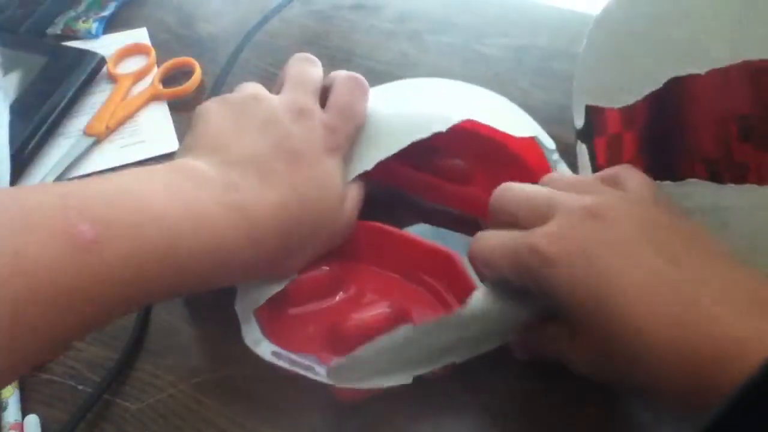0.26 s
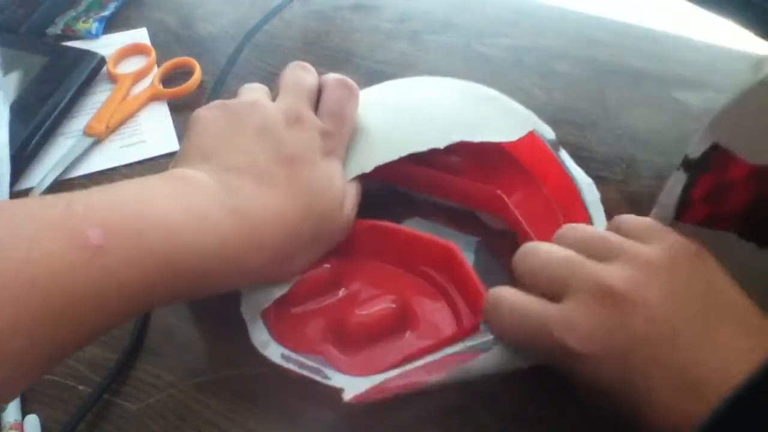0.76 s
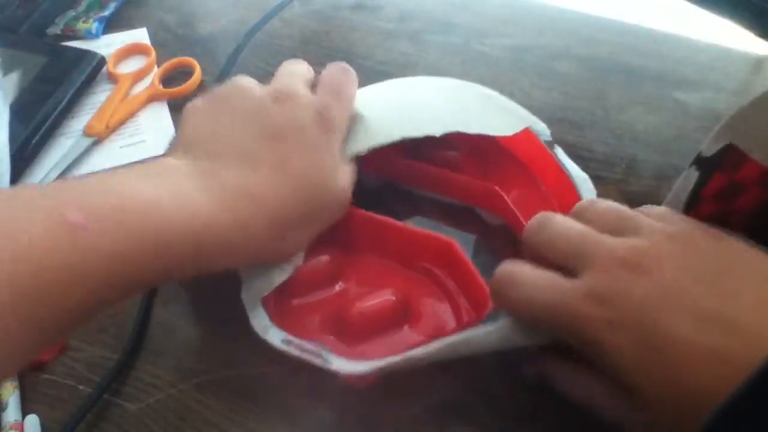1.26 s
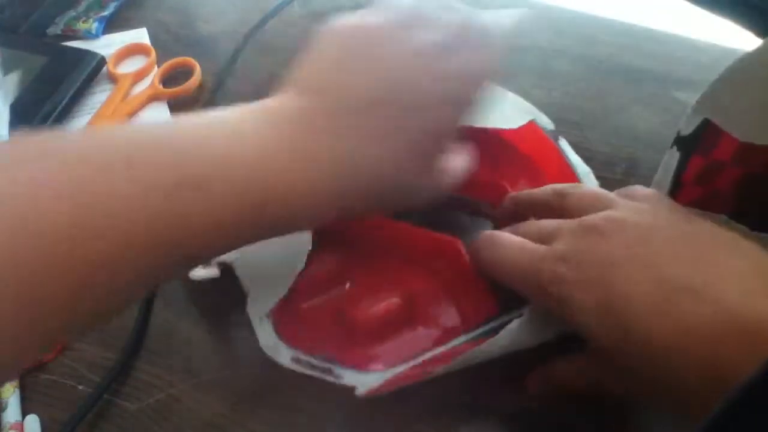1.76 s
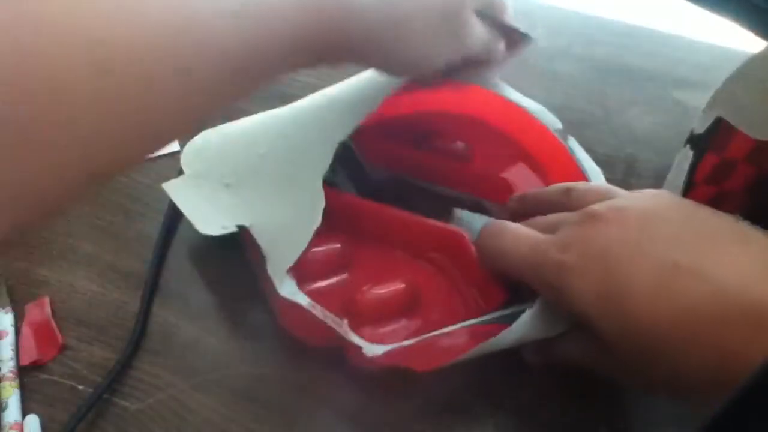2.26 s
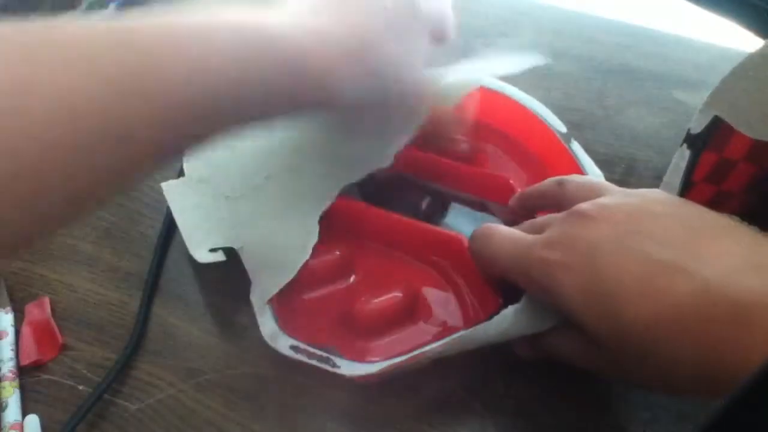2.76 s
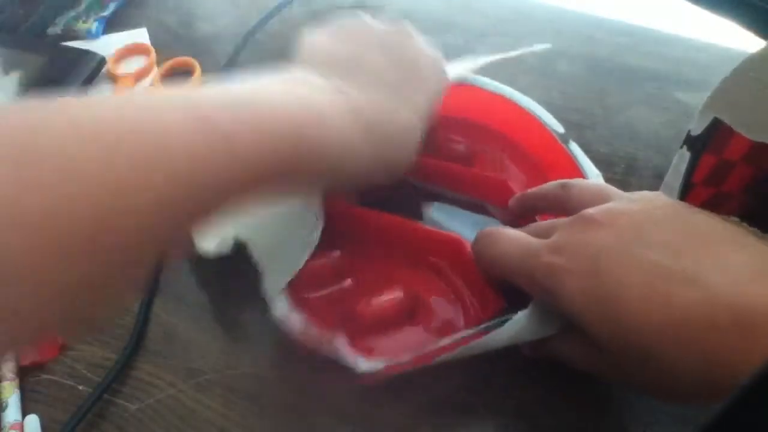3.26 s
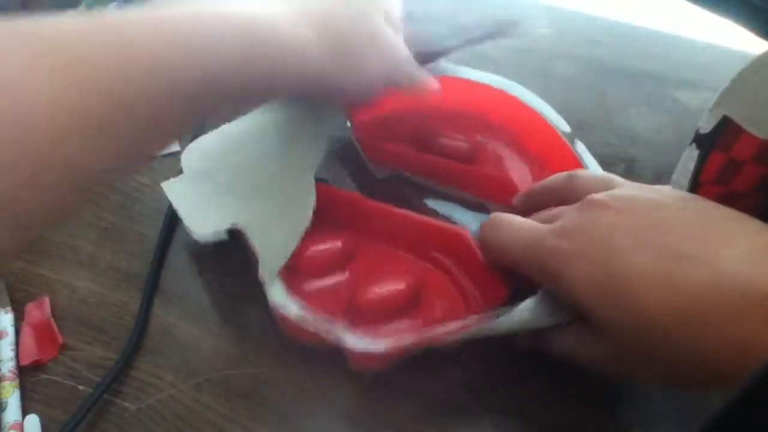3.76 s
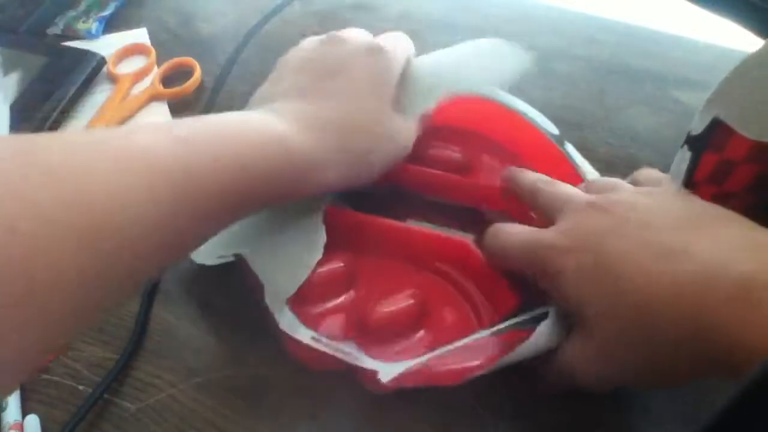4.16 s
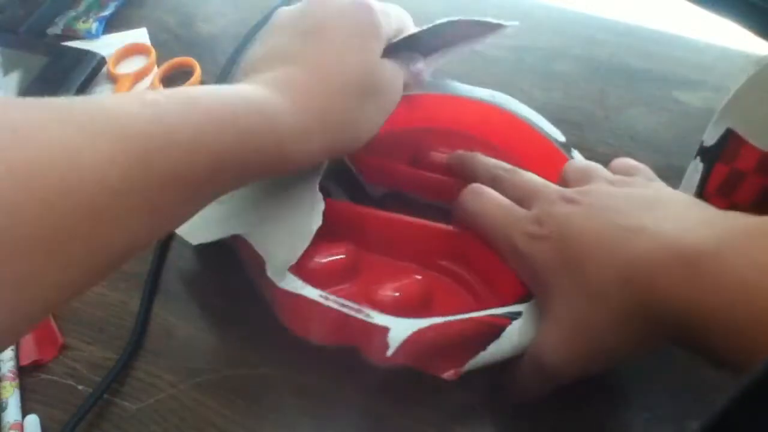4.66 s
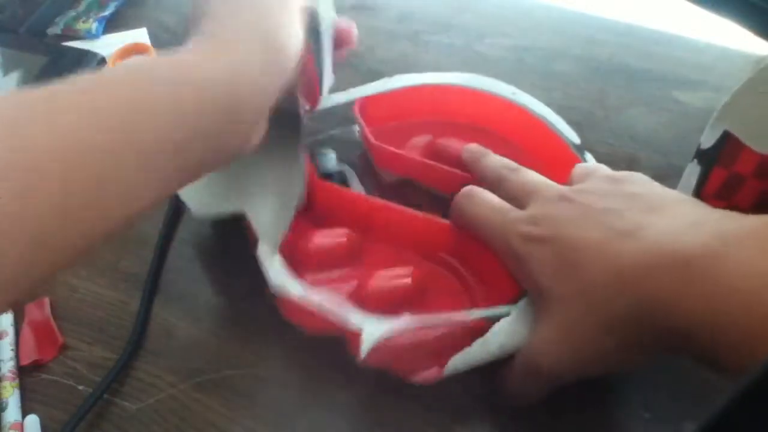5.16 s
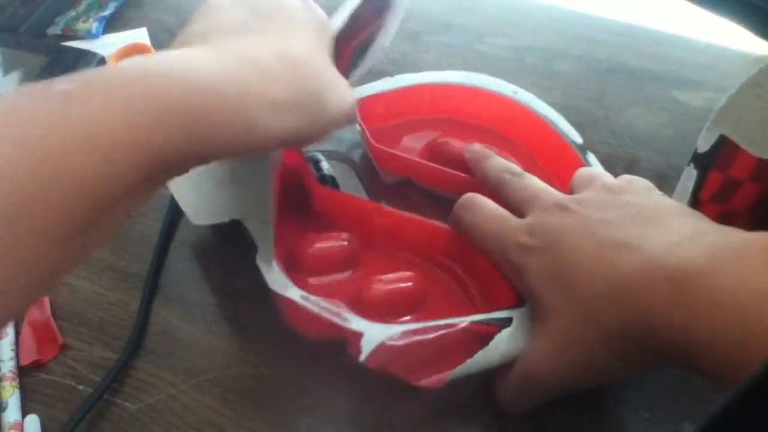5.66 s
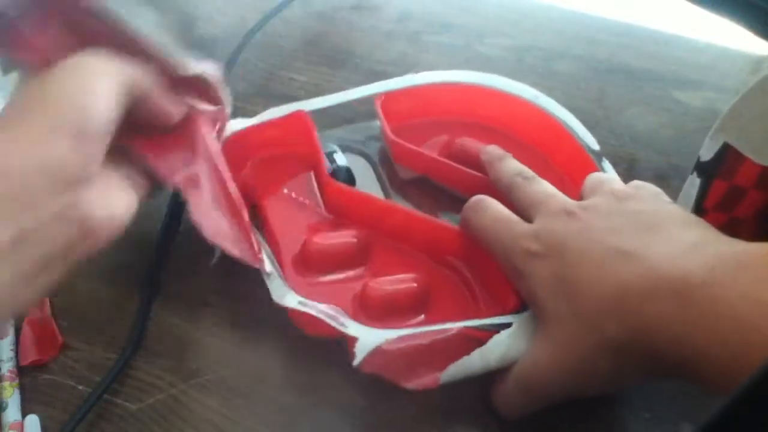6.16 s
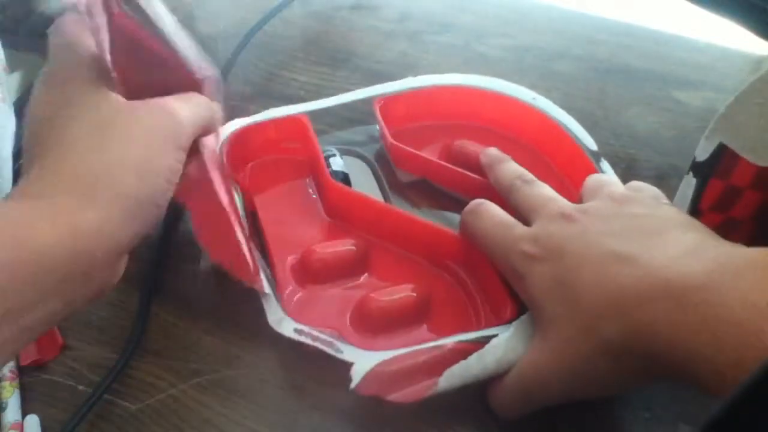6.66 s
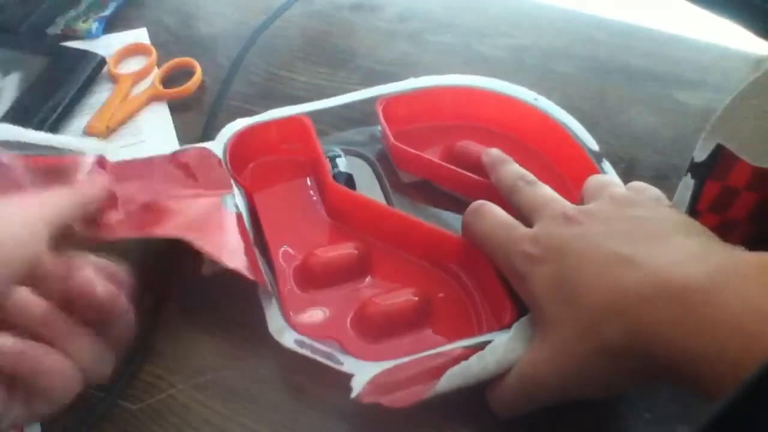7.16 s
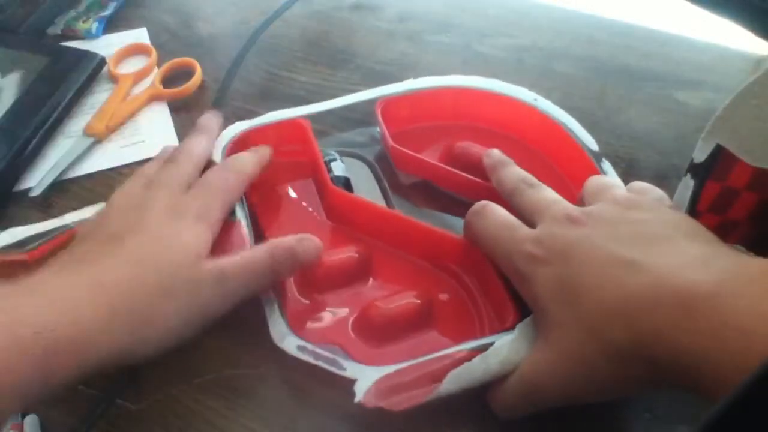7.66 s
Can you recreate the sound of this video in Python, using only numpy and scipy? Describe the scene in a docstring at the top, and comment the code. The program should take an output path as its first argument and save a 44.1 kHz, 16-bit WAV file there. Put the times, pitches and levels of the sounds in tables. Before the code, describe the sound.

A close, dry sound of card being torn off a thin plastic tray on a wooden table in a quiet room. From the start to 0.4 s, quick plastic pops, crackle and a brief creak; a hollow knock at 0.45, then the densest, loudest cluster of snaps at 0.6-0.8, followed by several knocks until 1.1. A small creak around 1.2, a snap with a knock at 1.45, then a hard pop near 2.0 and a sharp crack at 2.3. Faint crinkling leads to pops at 2.8 and 3.3-3.4, a dull knock at 3.85, and a bright snapping burst at 4.05. One strong pop at 4.8. From 5 to 6, small crackles and cracks, the brightest about 5.45, a pop at 5.67. Afterwards quiet uneven papery ripping, a pop at 6.6, soft bumps around 6.4, 6.9 and 7.55, and final clicks near 7.7. Low rumble and faint room tone throughout.

```python
"""In a quiet room, hands tear a card backing off a thin moulded plastic tray lying on a table.
The tray snaps as it buckles and knocks on the table top: rough contact forces ring decaying modes.
In between, random clicks through damped modes make the plastic crackle and the tray drag on the wood;
coloured, uneven noise is the bright hiss of ripping card. A dull rumble and room tone lie below."""
import sys
import numpy as np
from scipy import signal
from scipy.fft import rfft, irfft
from scipy.io import wavfile

SR = 44100
rng = np.random.default_rng(int(sys.argv[2]) if len(sys.argv) > 2 else 0)


def dump(signal):
    """Clip the signal to [-1, 1] and save it as 16-bit WAV at the path in sys.argv[1]."""
    limited = np.clip(np.atleast_2d(signal).T, -1, 1)
    pcm = np.round(limited * 32767).astype(np.int16)
    wavfile.write(sys.argv[1], SR, pcm)


N = 348381

# the plastic buckles: (time [s], level [dB], panel pitch [Hz], crack gain [dB])
SNAPS = [(0.069, -15, 1830, -11), (0.094, -15.5, 1400, -22), (0.12, -20, 1280, -5), (0.179, -13.5, 860, -4),
         (0.191, -9.5, 915, -36), (0.225, -18, 900, -11), (0.293, -25, 907, -10), (0.349, -20, 1410, -17),
         (0.575, -9.5, 1000, -11.5), (0.627, -5, 1600, -13), (0.71, -7.5, 1900, -3.5),
         (0.723, -6, 1900, -3), (0.755, -18, 1960, -31), (0.787, -9.5, 1030, -35), (0.922, -20, 1040, -21),
         (1.1, -30, 1130, 0.5), (1.151, -29, 1650, 2), (1.452, -12.5, 1210, -49), (1.607, -21, 1350, -39),
         (1.627, -21, 1380, -25), (1.638, -22.5, 1400, -35), (1.849, -22, 1330, -40),
         (1.975, -1.5, 1310, -36), (2.045, -17.5, 1070, -21), (2.121, -26, 2050, -1.5),
         (2.195, -18, 990, -31), (2.238, -15, 1340, -8), (2.278, -11.5, 2280, -28), (2.312, -17, 1350, -27),
         (2.322, -6, 1460, -1), (2.511, -21.5, 2260, -5), (2.776, -16, 1890, -6.5), (2.825, -9, 1900, -7),
         (3.105, -26, 1900, -27), (3.156, -21.5, 840, -19), (3.24, -19, 1170, -34), (3.278, -14, 1890, -44),
         (3.329, -7, 1900, -11), (3.403, -28, 1850, -31), (3.417, -5.5, 925, -3.5),
         (3.543, -19.5, 1720, -38), (4.032, -8, 2700, -2), (4.044, -12.5, 1720, -9),
         (4.062, -4.5, 1690, -37), (4.192, -18, 1190, -43), (4.705, -22.5, 1020, -40),
         (4.755, -19.5, 1470, -22), (4.799, -1, 1340, -23.5), (5.008, -31.5, 1710, 1),
         (5.082, -18, 950, -12), (5.169, -20.5, 1190, -14), (5.19, -23, 1950, -7), (5.272, -26, 1700, -18),
         (5.287, -21, 1470, -10), (5.402, -25.5, 1530, -5), (5.446, -12.5, 1160, 6),
         (5.62, -19.5, 1070, -33), (5.669, -8.5, 1840, -46), (5.736, -29, 1270, 4.5),
         (5.801, -20, 1850, -32), (5.834, -21, 2000, -8), (5.873, -24, 2020, -22), (5.935, -27, 2130, -40),
         (6.082, -24.5, 2040, -18), (6.12, -27, 1900, 1.5), (6.146, -33, 1260, -36),
         (6.265, -39, 1200, 6.5), (6.338, -38, 1230, -13), (6.382, -21.5, 2050, -9),
         (6.456, -31, 1290, -19), (6.619, -10, 1320, -44), (6.684, -25.5, 1370, -14),
         (7.063, -28, 2020, -6), (7.146, -29.5, 1230, -23), (7.557, -24.5, 1970, -13),
         (7.659, -8.5, 1340, -37), (7.669, -13, 2270, -36), (7.716, -21, 1060, -21)]
# a glued seam creaks in eight slips: (start time [s], first gap [s], level [dB])
CREAKS = [(0.061, 0.0055, -29.5), (.326, .031, -31), (1.208, 0.011, -31)]
# modes of the tray, before hands damp them: (frequency [Hz], level [dB], t60 [s])
TRAY = [(974, 6, 0.022), (1214, 12.5, 0.021), (1340, 4, 0.047), (1690, 9.5, 0.019), (2040, 10, 0.024),
        (2280, 11.5, 0.0095), (2713, 1.5, 0.037), (3063, -4.5, 0.086)]
# short high modes of a crease: (frequency [Hz], level [dB], t60 [s])
CREASE = [(3500, -5, .005), (4300, 0, .004), (5100, -1, .005), (6000, -8, .004), (7200, -3, .006),
          (9500, -12, .003)]
POP_CYCLES = 11   # a flipping panel falls 60 dB in this many cycles
CREAK_QUICKENS = .8   # each gap between slips is this share of the last
SLIP_HZ, SLIP_CRACK_DB = 1900, -0.5   # panel pitch and crack gain of a slip
SLIP_CREASE_HZ = 7460   # a slip's crack is strongest around here


def creak_slips():
    """A seam sticks and slips ever faster; each slip is laid out as a row like a snap."""
    gaps = (1 - CREAK_QUICKENS ** np.arange(8)) / (1 - CREAK_QUICKENS)   # in units of the first gap
    return [(s + gap_s * k, level_db, SLIP_HZ, SLIP_CRACK_DB, 1)
            for s, gap_s, level_db in CREAKS for k in gaps]


def snaps():
    """A panel flips over with a short pop at its own pitch, the tray rings on; the crease cracks brighter."""
    rows = [(*row, 0) for row in SNAPS] + creak_slips()
    out, tray = np.zeros(N), len(TRAY)
    force = rng.standard_normal((len(rows), 2, 400))
    luck = rng.standard_normal((len(rows), 2, tray + len(CREASE)))
    for (s, level_db, hz, crack_db, slip), (push, tick), (chance, flex) in zip(rows, force, luck):
        bend = 1 + .015 * flex
        strength_db = 3 * chance
        # soft-edged; a small panel radiates little bass
        flip = np.diff(np.convolve(rough_force(push, .0003, .0016), np.hanning(16)))
        pop = struck([(hz, 0, POP_CYCLES / hz)], np.zeros(1), np.ones(1), flip)
        ring_db = near(TRAY, hz, fall_db=9) + strength_db[:tray]
        ring = struck(TRAY, ring_db, bend[:tray], flip)
        crease_db = strength_db[tray:] + slip * near(CREASE, SLIP_CREASE_HZ, fall_db=12)
        crack = struck(CREASE, crease_db, bend[tray:], rough_force(tick, .0003, .0008))
        snap = from_db(-3.5) * pop + from_db(-4.0) * ring + from_db(crack_db) * crack
        add(out, s, from_db(level_db) * snap)
    return out


# the tray knocks on the table: (time [s], level [dB], hollow pitch [Hz], 60 dB decay [cycles, at least 2])
KNOCKS = [(0.065, -13.5, 245, 19), (0.413, -22.5, 337, 20), (0.45, -8, 266, 9.7), (0.509, -17, 458, 12),
          (0.722, -10.5, 447, 3.4), (0.831, -10.5, 261, 11), (0.925, -11, 460, 13), (0.936, -10, 497, 12),
          (0.948, -8.5, 260, 19), (1.003, -10, 460, 4.3), (1.064, -20, 271, 16), (1.099, -16, 470, 30),
          (1.232, -14, 354, 5), (1.439, -18, 386, 9.9), (1.452, -12, 302, 17), (2.235, -12, 450, 14),
          (2.321, -14, 403, 13), (3.414, -14.5, 396, 11), (3.536, -25.5, 455, 32),
          (3.857, -16.5, 327, 1.73), (4.18, -20, 450, 7), (4.45, -29, 460, 15), (4.499, -24.5, 430, 19),
          (4.532, -21.5, 290, 20), (6.152, -27, 318, 49), (6.351, -26.5, 320, 14), (6.602, -20, 243, 2.6),
          (6.89, -27.5, 248, 8.3), (6.931, -26.5, 266, 1.7)]
KNOCK_POP_DB, KNOCK_RING_DB = -3.5, -23.5   # hollow under the tray, tray itself


def knocks():
    """A soft contact rings the hollow at its own pitch and, faintly, the tray modes."""
    out = np.zeros(N)
    force = rng.standard_normal((len(KNOCKS), 900))
    luck = rng.standard_normal((len(KNOCKS), len(TRAY)))
    for (s, level_db, hz, cycles), push, chance in zip(KNOCKS, force, luck):
        contact = rough_force(push, .001, .003)
        pop = struck([(hz, 0, np.maximum(cycles, 2) / hz)], np.zeros(1), np.ones(1), contact)
        ring = struck(TRAY, 3 * chance, np.ones(len(TRAY)), contact)
        add(out, s, from_db(level_db) * (from_db(KNOCK_POP_DB) * pop + from_db(KNOCK_RING_DB) * ring))
    return out


def handling():
    """Crackling plastic, ripping card and dragging tray all follow the effort of the hands."""
    crackle_gain, rip_gain, drag_gain = effort()
    surge = from_db(1.5 * drift(12))   # the pull comes unevenly and moves all layers
    lone = lone_crinkles()
    return surge * (crackle_gain * crackle(lone) + rip_gain * rip(lone) + drag_gain * drag())


# a tug tears card free: (time it gives [s], build-up [s], crackle gain [dB], rip re crackle [dB])
TUGS = [(0.089, 0.053, -29.5, -29), (0.203, 0.11, -26.5, -14), (.47, 0.41, -35.5, -15),
        (0.649, 0.2, -29.5, -11), (0.733, 0.053, -19.5, -15), (1.49, 0.075, -27.5, -20),
        (1.981, 0.18, -31, -15.5), (2.25, 0.075, -39.5, 0), (2.52, 0.42, -40, -10.5),
        (2.62, 0.2, -36.5, -11), (3.28, 0.16, -38, -37), (3.43, 0.03, -30.5, -11.5),
        (3.828, 0.083, -36, -11.5), (4.051, 0.015, -20.5, -17.5), (4.19, 0.3, -36.5, -33),
        (4.545, 0.29, -38, -13), (4.93, 0.25, -35, -13.5), (5.091, 0.033, -27.5, -15),
        (5.869, 0.21, -37, -8), (6.2, 0.66, -43.5, -4.5), (6.376, 0.36, -44.5, -3.5),
        (6.62, 0.77, -42.5, -9), (6.925, 0.054, -36, -11), (7.07, 0.13, -41, -12.5),
        (7.556, 0.08, -39, -6.5), (7.69, 0.048, -29.5, -16)]
# the hands keep working the tray between tugs: (time [s], crackle gain [dB])
GRIP = [(0.0, -51), (1.1, -46.5), (2.3, -42.5), (3.0, -54), (3.35, -35.5), (3.7, -54.5), (5.1, -46),
        (6.2, -47), (6.8, -56), (7.9, -48)]
BUILD_DB, RELEASE_DB_PER_S = 12.5, 227   # rise over one build-up time; fall once the card has given
GRIP_RIP_DB, DRAG_DB = -20.5, -10.5   # gains relative to the crackle gain
# drag around each knock: gain relative to the knock level, build-up, fall
SHUFFLE_DB, SHUFFLE_LEAD_S, SHUFFLE_DB_PER_S = -27.5, .027, 149
# crackle around each snap: gain relative to the snap level, build-up, fall
AFTER_DB, AFTER_LEAD_S, AFTER_DB_PER_S = -25, .004, 700


def effort():
    """Gains of crackle, rip and drag: steady grip, tugs, and the flurry around each snap and knock."""
    s, build_s, crackle_db, rip_db = np.transpose(TUGS)
    knock_s, knock_db = np.transpose(KNOCKS)[:2]
    snap_s, snap_db = np.transpose(SNAPS)[:2]
    # powers, hence the doubled decibels
    grip = from_db(2 * in_time(GRIP)[0])
    crackle_power = grip + humps(s, build_s, crackle_db, RELEASE_DB_PER_S)
    rip_power = grip * from_db(2 * GRIP_RIP_DB) + humps(s, build_s, crackle_db + rip_db, RELEASE_DB_PER_S)
    shuffle = humps(knock_s, SHUFFLE_LEAD_S, knock_db + SHUFFLE_DB, SHUFFLE_DB_PER_S)
    drag_power = crackle_power * from_db(2 * DRAG_DB) + shuffle
    flurry = humps(snap_s, AFTER_LEAD_S, snap_db + AFTER_DB, AFTER_DB_PER_S)
    return np.sqrt([crackle_power + flurry, rip_power, drag_power])


CRINKLE_RISE_S, CRINKLE_LAST_S = .0003, .002   # time constants of a lone crinkle


def lone_crinkles():
    """Sparse clicks, each widened to a short push that builds and dies away."""
    clicks = random_clicks(per_s=90, spread_db=3.5, clump_db=5, clump_hz=10)
    push = rough_force(np.ones(800), CRINKLE_RISE_S, CRINKLE_LAST_S)
    return signal.fftconvolve(np.abs(clicks), np.abs(push))[:N]


def crackle(lone):
    """Thin plastic crackles: dense fine clicks and lone crinkles ring the hand-damped tray."""
    clicks = random_clicks(per_s=2200, spread_db=4, clump_db=4.5, clump_hz=70)
    fine = grains(TRAY, 3, clicks)
    return from_db(-3) * (from_db(-2) * fine + from_db(-1.5) * crinkles(TRAY, 2, lone))


# hiss of ripping card fibres: (frequency [Hz], level [dB])
RIP = [(1760, -31), (3000, 2.5), (7200, 2.5), (12400, -8), (16000, -33)]


def rip(lone):
    """Card fibres give way one by one: spiky, uneven noise, with lone crinkles ticking in the treble."""
    unevenness_db = 1.0 * rng.exponential(1, N) + 7.1 * np.tanh(drift(60))
    fibres = coloured(rng.standard_normal(N) * from_db(unevenness_db), RIP)
    return fibres + from_db(-7) * crinkles(CREASE, 1, lone)


# modes of tray and table together, before damping: (frequency [Hz], level [dB], t60 [s])
TABLE = [(108, 36, 0.014), (129, 41, 0.029), (245, 13, 0.034), (307, 6.5, 0.088), (463, 12, 0.037)]


def drag():
    """The tray scrapes over the wood: many small clicks ring the upper modes of tray and table."""
    return grains(TABLE[2:], 1.3, random_clicks(per_s=1000, spread_db=1.5, clump_db=3, clump_hz=14))


# the hands press on the table: (time [s], rumble gain [dB])
RUMBLE = [(0.0, -57), (2.8, -63), (7.9, -60)]
# the heel of a hand bumps the table softly: (time [s], rumble gain [dB])
BUMPS = [(6.36, -52), (6.93, -45.5), (7.55, -46)]
BUMP_LEAD_S, BUMP_DB_PER_S = .05, 117   # build-up, fall


def rumble():
    """Clumped soft pushes into the two lowest modes of the table."""
    pushes = random_clicks(per_s=330, spread_db=-2.0, clump_db=3.0, clump_hz=8.9)
    soft_pushes = signal.lfilter([1], [1, -1.9, .9025], pushes)
    s, bump_db = np.transpose(BUMPS)
    power = from_db(2 * in_time(RUMBLE)[0]) + humps(s, BUMP_LEAD_S, bump_db, BUMP_DB_PER_S)
    boom = np.diff(grains(TABLE[:2], 1.6, soft_pushes), prepend=0)
    return np.sqrt(power) * rms_one(boom)


ROOM_T60_S, WALL_CUT_HZ = .2, 1800   # decay and dullness of the tail


def room(x):
    """A diffuse tail: dull noise that starts after the first wall and dies away."""
    t = np.arange(SR // 2) / SR
    pole = np.exp(-2 * np.pi * WALL_CUT_HZ / SR)
    dull = signal.lfilter([1], [1, -2 * pole, pole ** 2], rng.standard_normal(len(t)))
    tail = dull * from_db(-60 * t / ROOM_T60_S) * (t > .004)
    return signal.fftconvolve(x, tail / np.sqrt(np.sum(tail ** 2)))[:N]


# steady noise of the quiet room: (frequency [Hz], relative density [dB per Hz])
ROOM_TONE = [(30, -24), (313, -1.5), (742, 10.5), (1140, -3.5), (2000, 0.5), (3590, -4.5), (6940, -4),
             (15900, -12.5)]
ROOM_TONE_DB = -58   # rms


def room_tone():
    """Steady noise shaped by the spectrum of the room."""
    return from_db(ROOM_TONE_DB) * coloured(rng.standard_normal(N), ROOM_TONE)


def from_db(db):
    """Decibels to gain."""
    return 10 ** (np.asarray(db) / 20)


def rms_one(x):
    """Scale to rms 1."""
    return x / np.sqrt(np.mean(x ** 2) + 1e-20)


def in_time(rows):
    """Columns of a curve table, one value per sample."""
    s, *columns = np.transpose(rows)
    return [np.interp(np.arange(N) / SR, s, c) for c in columns]


def drift(rate_hz):
    """Slow chance of spread 1: noise through two poles at rate_hz, made at every 40th sample."""
    r = np.exp(-80 * np.pi * rate_hz / SR)
    slow = signal.lfilter([1], [1, -2 * r, r * r], rng.standard_normal(N // 40 + 2002))[2000:]
    return np.interp(np.arange(N) / 40, np.arange(len(slow)), rms_one(slow))


def coloured(x, spectrum):
    """Shape x by a spectrum of (frequency [Hz], level [dB]); rms 1."""
    hz, level_db = np.transpose(spectrum)
    bins = np.arange(1, N // 2 + 2) * SR / N
    gain = from_db(np.interp(np.log(bins), np.log(hz), level_db))
    return rms_one(irfft(rfft(x) * gain, N))


def rough_force(draw, rise_s, last_s):
    """A contact force that builds quickly and dies away, as grainy as the draw."""
    t = np.arange(len(draw)) / SR
    return draw * (1 - np.exp(-t / rise_s)) * np.exp(-t / last_s)


def struck(modes, strength_db, bend, contact):
    """One blow: every mode rings with its strength, detuned by the bend of the moment; peak 1."""
    hz, level_db, t60 = np.transpose(modes)[:, :, None]
    t = np.arange(4000) / SR
    decay = from_db(level_db + strength_db[:, None] - 60 * t / t60)
    rings = decay * np.sin(2 * np.pi * hz * bend[:, None] * t)
    wave = signal.fftconvolve(rings.sum(axis=0), contact)[:len(t)]
    return wave / np.max(np.abs(wave))


def near(modes, hz, fall_db):
    """Modes far from the struck pitch are weaker, by fall_db an octave."""
    return -fall_db * np.abs(np.log2(np.array(modes)[:, 0] / hz))


def add(out, s, wave):
    """Mix wave into out from time s."""
    i = int(round(s * SR))
    out[i:i + len(wave)] += wave[:N - i]


def random_clicks(per_s, spread_db, clump_db, clump_hz):
    """Clicks of uneven size and sign, whose nominal rate swells and thins in clumps."""
    sizes = from_db(spread_db * np.minimum(rng.exponential(1, N), 3)) * rng.choice([-1, 1], N)
    return sizes * (rng.random(N) < per_s * from_db(clump_db * np.minimum(drift(clump_hz), 1)) / SR)


def ringing(clicks, hz, t60):
    """A unit click sets a decaying sine of starting height 1 ringing."""
    r, w = from_db(-60 / (t60 * SR)), 2 * np.pi * hz / SR
    return signal.lfilter([0, np.sin(w)], [1, -2 * r * np.cos(w), r * r], clicks + 1e-18)


WANDER_DB, WANDER_HZ = 3.5, 12   # modes wax and wane one by one as the body bends


def wandering(level_db):
    """Gain of one mode, drifting around its level."""
    return from_db(level_db + WANDER_DB * drift(WANDER_HZ))


def grains(modes, damping, clicks):
    """Each click is dealt to one mode, its ring shortened by the damping; rms 1."""
    dealt = rng.integers(0, len(modes), N)
    return rms_one(sum(wandering(level_db) * ringing(clicks * (dealt == k), hz, t60 / damping)
                       for k, (hz, level_db, t60) in enumerate(modes)))


def crinkles(modes, damping, clicks):
    """The push reaches all modes at once, with a new random strength in each at every sample; rms 1."""
    return rms_one(sum(wandering(level_db) * ringing(clicks * rng.standard_normal(N), hz, t60 / damping)
                       for hz, level_db, t60 in modes))


def humps(s, build_s, peak_db, release_db_per_s):
    """Summed power of swells that build up to their peak at s and then fall away."""
    t = np.arange(0, N + 64, 64) / SR - np.array(s)[:, None]   # every 64th sample
    build_s = np.maximum(np.reshape(build_s, (-1, 1)), .003)
    below_db = np.where(t < 0, -BUILD_DB * t / build_s, release_db_per_s * t)
    power = np.sum(from_db(2 * (np.array(peak_db)[:, None] - below_db)), axis=0)
    return np.interp(np.arange(N) / 64, np.arange(len(power)), power)


BASS_CUT_HZ, TREBLE_CUT_HZ = 228, 10170
ROOM_DB = -18   # room tail relative to the pack


def scene():
    """The pack close by, thinned in bass and treble, with its room tail, table rumble and room tone."""
    pack = snaps() + knocks() + handling()
    band = signal.butter(2, [BASS_CUT_HZ, TREBLE_CUT_HZ], "band", fs=SR, output="sos")
    pack = signal.sosfilt(band, pack)
    return (pack + from_db(ROOM_DB) * room(pack) + rumble() + room_tone())[None]


CUTOFF_HZ = 16600   # 70 dB down from here up


def record(dry):
    """The highest peaks are rounded, the top is cut."""
    top = .8   # the rounded wave stays below this
    rounded = dry / (1 + np.abs(dry / top) ** 4) ** .25
    return signal.sosfilt(signal.cheby2(12, 70, CUTOFF_HZ, fs=SR, output="sos"), rounded)


dry = scene()
out = record(dry)
dump(out)
```